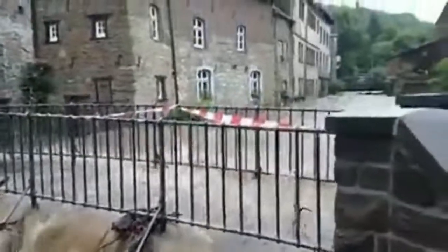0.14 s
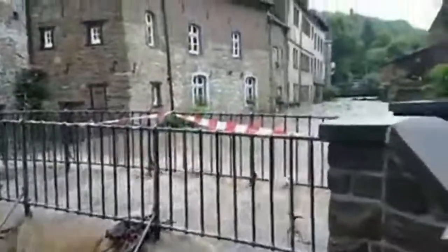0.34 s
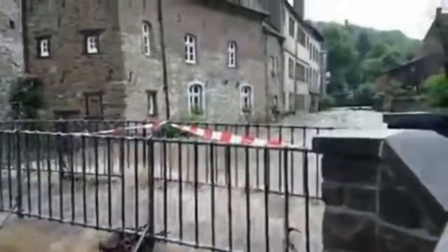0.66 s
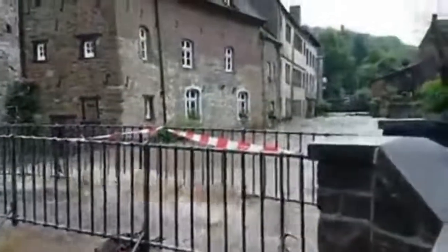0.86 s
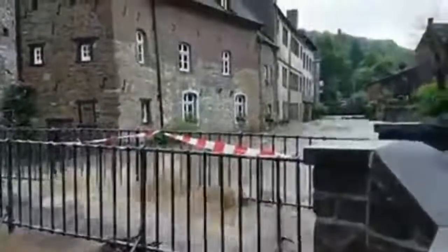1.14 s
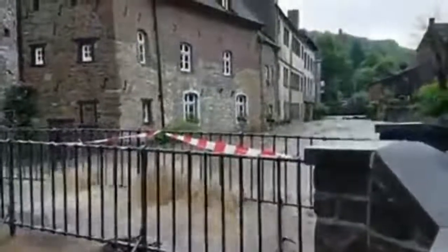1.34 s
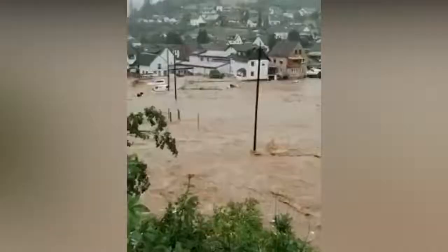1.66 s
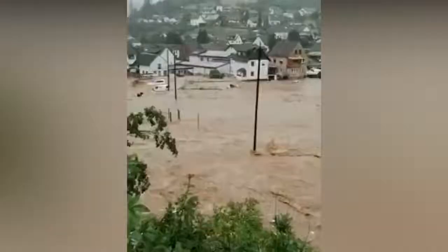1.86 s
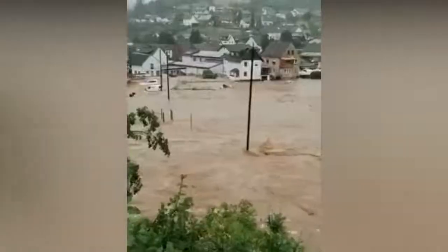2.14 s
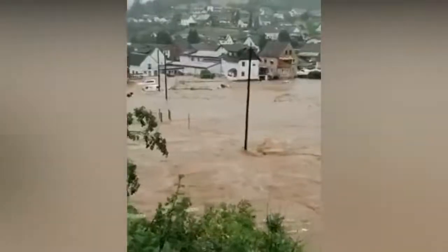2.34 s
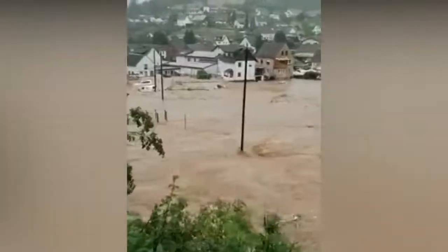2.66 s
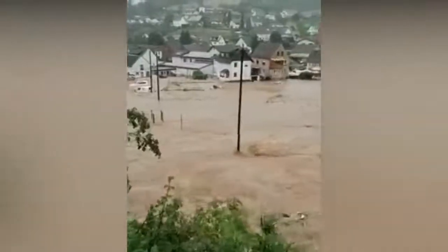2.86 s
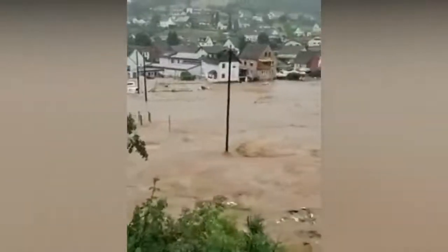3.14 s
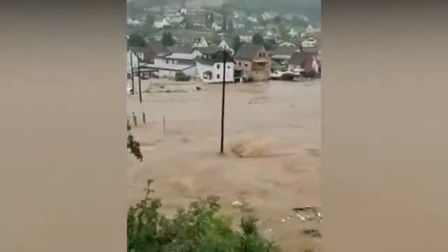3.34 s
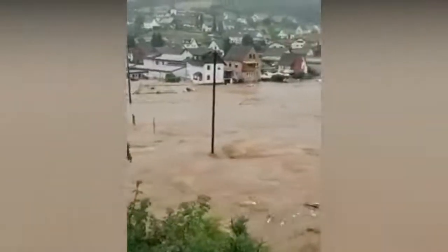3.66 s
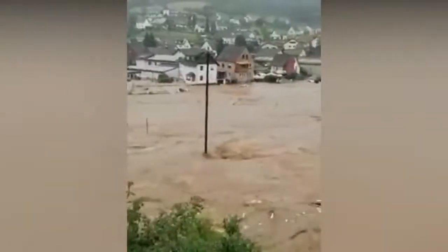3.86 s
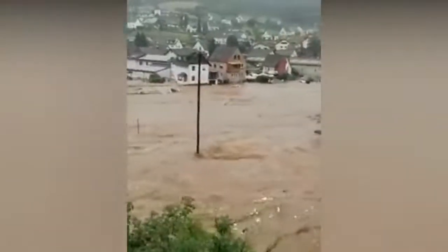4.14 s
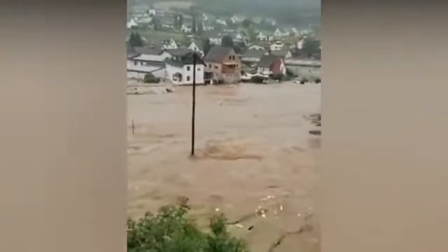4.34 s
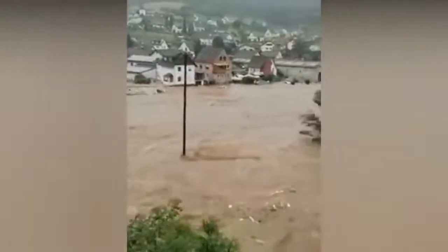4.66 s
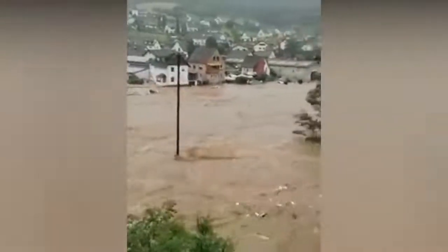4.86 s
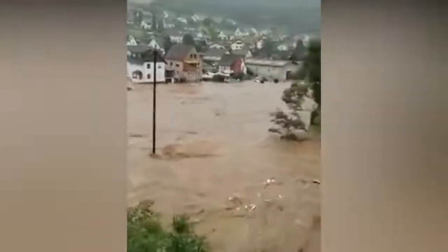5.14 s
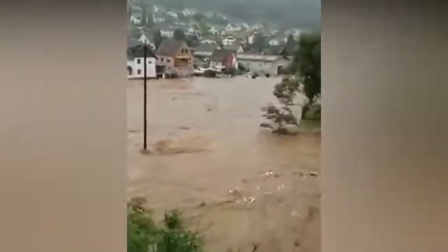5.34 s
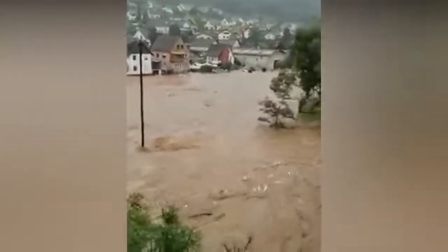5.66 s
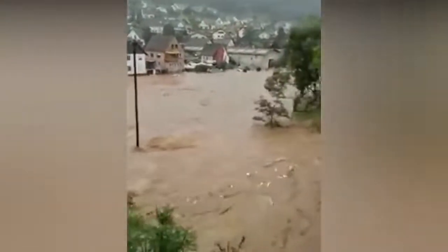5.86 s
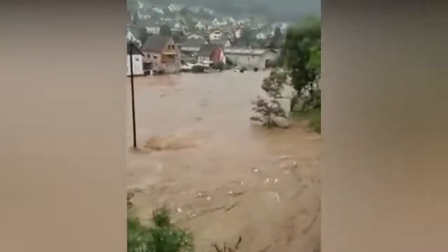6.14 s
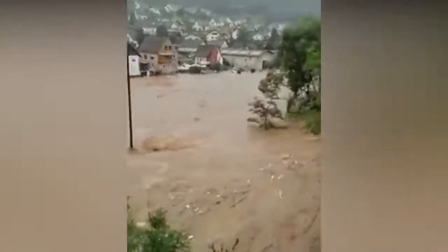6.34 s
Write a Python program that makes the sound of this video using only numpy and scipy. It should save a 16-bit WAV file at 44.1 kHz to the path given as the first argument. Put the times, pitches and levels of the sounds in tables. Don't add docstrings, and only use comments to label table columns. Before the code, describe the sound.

Loud close floodwater on a stone street, caught by a two-microphone phone with grainy compressed treble: churning bubbles, spray, slops ringing in a hollow, wind thumps. A hard cut leaves brief silence. Then, from a hillside, another phone hears a broad swollen river, smoother, duller and much quieter, a continuous rush with no separate splashes, faint wind nudges and a slightly flickering top end.

```python
import sys
import numpy as np
from scipy import signal
from scipy.fft import rfft, irfft, next_fast_len
from scipy.io import wavfile
from scipy.ndimage import uniform_filter1d, map_coordinates

SR = 44100
rng = np.random.default_rng(int(sys.argv[2]) if len(sys.argv) > 2 else 0)


def gain_from_db(level_db):
    decades = np.asarray(level_db, float) / 20
    return 10 ** decades


def output_pcm(signal):
    pcm = np.clip(np.atleast_2d(signal).T, -1, 1) * 32767
    wavfile.write(sys.argv[1], SR, np.round(pcm).astype(np.int16))


N = 286209


def unit(x):
    return x / np.sqrt(np.mean(x ** 2) + 1e-20)


def along(points, hz):
    f, v = np.transpose(points)
    return np.interp(np.log(hz + 1), np.log(f + 1), v)


def curve(rows):
    s, value = np.transpose(rows)
    return np.interp(np.arange(N) / SR, s, value)


def near(t, moments, within_s):
    return abs(t[:, None] - moments).min(axis=1) < within_s


def wobble(rate_hz):
    knots = rng.standard_normal(int(N * rate_hz / SR) + 4)
    return map_coordinates(knots, [np.arange(N) * rate_hz / SR])


def filtered(x, response):
    m = next_fast_len(N + 8192)
    return irfft(rfft(x, m) * response(np.fft.rfftfreq(m, 1 / SR)), m)[..., :N]


def coloured(x, spectrum):
    return filtered(x, lambda hz: gain_from_db(along(spectrum, hz)))


def patches(shape, bins, frames):
    field = uniform_filter1d(rng.standard_normal(shape), size=bins, axis=-2)
    return unit(uniform_filter1d(field, size=frames, axis=-1))


def to_lines(x):
    return signal.stft(x, SR, "cosine", nperseg=2048, noverlap=1024)


def from_lines(z):
    return signal.istft(z, SR, "cosine", nperseg=2048, noverlap=1024)[1][..., :N]


def local_level(z):
    return np.sqrt(abs(uniform_filter1d(abs(z) ** 2, size=32, axis=-2)))


def bubbles(count):
    when, pitch, size, port = rng.random((count, 4)).T
    hz, t = 300 * 25 ** pitch[:, None], np.arange(256) / SR
    cycles = hz * t * (1 + .04 * hz * t)
    decay = hz * t * np.exp(-hz * t / 1.8) * np.hanning(512)[256:]
    burst = -np.log(1 - size[:, None]) * np.sin(2 * np.pi * cycles) * decay
    where = (when * N).astype(int)[:, None] + np.arange(256) + (port[:, None] > .5) * (N + 256)
    return np.bincount(where.ravel(), burst.ravel(), 2 * (N + 256)).reshape(2, -1)[:, :N]


def churn(patchy_db, bubble_db, count):
    z = signal.stft(rng.standard_normal((2, N)), nperseg=512)[2]
    gain = gain_from_db(patchy_db * patches(z.shape[1:], 5, 10))
    bed = signal.istft(z * gain, nperseg=512)[1][:, :N]
    return unit(bed) + gain_from_db(bubble_db) * unit(bubbles(count))


# f/Hz, coherence/1
PORT_LIKENESS = [(150, 1), (230, .998), (330, .95), (600, .7), (1200, .36), (1500, .5), (1800, .42),
                 (2200, .14), (2700, .38), (3300, .06), (13000, .12)]
# f/Hz, phase/rad
LEFT_LEAD = [(220, 0), (600, .2), (1000, 1.2), (1500, 3.1), (2700, 6.5), (13000, 30)]
# f/Hz, level/dB
LEFT_TILT = [(200, 0), (660, -1), (1200, -2), (2300, -4), (4000, -2), (6800, 0), (8500, 4.8), (13300, 4.6)]


def ports(pair, spectrum):
    def mix(hz):
        turn = np.arccos(np.clip(along(PORT_LIKENESS, hz), 0, 1)) / 2
        return gain_from_db(along(spectrum, hz)) * [np.cos(turn), np.sin(turn)]

    half = np.array([[.5], [-.5]])

    def tilt(hz):
        return gain_from_db(half * along(LEFT_TILT, hz)) * np.exp(1j * half * along(LEFT_LEAD, hz))

    shared, apart = filtered(pair, mix)
    return unit(filtered(np.array([shared + apart, shared - apart]), tilt))


# f/Hz, level/dB per Hz
SURGE_SPECTRUM = [(40, -43), (60, -15), (85, -7.5), (150, -4), (200, -7), (290, -6.5), (420, -17),
                  (600, -59.5)]


def surge(heave_db, swell):
    return gain_from_db(-20.5 + heave_db + .2 * swell) * ports(churn(.3, -29.5, count=2000), SURGE_SPECTRUM)


# f/Hz, level/dB per Hz
GURGLE_SPECTRUM = [(200, -44), (280, -10.5), (370, -4), (650, -2.5), (1000, -4.5), (1300, -5), (1700, -16),
                   (2400, -56)]


def gurgle(heave_db, swell):
    level_db = -19.5 + .2 * heave_db + .34 * swell
    return gain_from_db(level_db) * ports(churn(.83, -24, count=9000), GURGLE_SPECTRUM)


# f/Hz, level/dB per Hz
SPRAY_SPECTRUM = [(900, -42), (1400, -1.5), (2000, -3), (2700, -3), (3600, -6.5), (4500, -8), (6000, -9),
                  (7200, -13.5), (8400, -19), (9500, -22.5), (13300, -22.5)]


def spray(heave_db, swell):
    drops = ports(churn(.97, -18.5, count=9000), SPRAY_SPECTRUM)
    mist = filtered(drops, lambda hz: np.clip((hz - 6500) / 2500, 0, 1))
    puffs = gain_from_db(1.1 * wobble(22)) - 1
    return gain_from_db(-18 + .15 * heave_db + .34 * swell) * (drops + puffs * mist)


# t/s, peak level/dB
PUFFS = [(.19, -34), (.28, -31), (.58, -34.5), (.77, -36), (.94, -36), (1.1, -35), (1.27, -35), (1.48, -34),
         (1.63, -34.5), (2.67, -53), (2.88, -55), (3.04, -47), (3.4, -59), (3.68, -51), (3.9, -46),
         (4.04, -49), (4.3, -45), (4.56, -53), (5.04, -41.5), (5.1, -43), (5.25, -50), (5.63, -51),
         (5.83, -49), (6.14, -51), (6.43, -55)]
PUFF_RISE_DB_S, PUFF_FALL_DB_S = 143, 112.5


def gusts():
    s, peak_db = np.transpose(PUFFS)
    since = np.arange(0, N + 256, 256)[:, None] / SR - s
    slope = np.where(since < 0, -PUFF_RISE_DB_S, PUFF_FALL_DB_S)
    level_db = (peak_db - slope * since).max(axis=1)
    return np.interp(np.arange(N), np.arange(len(level_db)) * 256, level_db)


# f/Hz, level/dB per Hz
BUFFET_SPECTRUM = [(15, -25.5), (28, -7.5), (45, 2), (75, 0.5), (120, -35.5)]


def wind(buffet_db, lumpy_db):
    push = coloured(rng.standard_normal(N), BUFFET_SPECTRUM)
    push = push / np.sqrt(abs(uniform_filter1d(push ** 2, size=SR // 16)) + 1e-12)
    return gain_from_db(buffet_db) * unit(gain_from_db(lumpy_db * wobble(12)) * push)


# t/s, pitch f/Hz, peak level/dB
GULPS = [
    (.22, 660, -21),
    (.68, 488, -24.5),
    (.76, 405, -26.5),
    (.82, 388, -20),
    (1.229, 600, -27.5),
]
GULP_RISE_S, GULP_FALL_S, GULP_WIDTH = .022, .05, .069


def slops():
    t = np.arange(N) / SR
    total = np.zeros(N)
    for s, pitch_hz, peak_db in GULPS:
        ring = filtered(rng.standard_normal(N), lambda hz: np.exp(-((hz / pitch_hz - 1) / GULP_WIDTH) ** 2))
        envelope = np.exp(-abs(t - s) / np.where(t < s, GULP_RISE_S, GULP_FALL_S))
        total += gain_from_db(peak_db) * envelope * unit(ring)
    return total


# t/s, level/dB
STREET_HEAVE = [
    (0, -0.5),
    (.2, -0.5),
    (.6, -1.5),
    (.75, -2),
    (1.0, -0.5),
    (1.25, 0.5),
    (1.35, -.5),
    (1.68, 1.5),
]


def street():
    heave_db, swell = curve(STREET_HEAVE), wobble(11.82)
    water = surge(heave_db, swell) + gurgle(heave_db, swell) + spray(heave_db, swell)
    return water + wind(gusts(), lumpy_db=3.5) + slops()


# f/Hz, share/1
COARSENESS = [(600, 0), (1500, .6), (2500, .5), (4000, 1.0), (7500, 1.2), (8500, .7), (13500, .6)]
# f/Hz, share/1
BAND_FRAGILITY = [(1150, 0), (1500, .14), (1950, 0), (3500, 0), (4500, .06), (6000, .05), (7000, .2),
                  (7900, .16), (8400, .02), (13500, .03)]
# low f/Hz, high f/Hz
WEAK_BANDS_HZ = [
    (7650, 8200),
    (6700, 7050),
    (1450, 1620),
]
# t/s, length/s, weak band number
BAND_LOSSES = [(0, .07, 0), (.12, .04, 0), (.35, .09, 0), (.65, .02, 0), (.72, .03, 0), (1.24, .06, 0),
               (.19, .04, 1), (1.05, .05, 1), (1.55, .08, 1), (.15, .13, 2), (.6, .03, 2), (.85, .13, 2)]
RIGHT_STARVED_S = [.23, .55, .7, .79, 1.15, 1.35, 1.49]
WARM_UP_S, RECOVER_S = .1, .9


def first_phone(x):
    hz, t, z = to_lines(np.array([x[0] + x[1], x[0] - x[1]]) / 2)
    z = z * (abs(z) > along(COARSENESS, hz)[:, None] * local_level(z))

    bands = np.repeat(patches((2, 129, len(t)), 1, 3), 8, axis=1)[:, :len(hz)]
    rank = np.argsort(np.argsort(bands, axis=None)).reshape(bands.shape) / bands.size
    share = along(BAND_FRAGILITY, hz) * [hz > 0, hz > 3000]
    z = z * (rank > share[..., None])
    for start, length, band in BAND_LOSSES:
        low, high = WEAK_BANDS_HZ[int(band)]
        lost = (t > start - .015) & (t < start + length + .015)
        z[0][np.ix_((hz > low) & (hz < high), lost)] = 0

    z = np.array([z[0] + z[1], z[0] - z[1]])
    lasting = np.repeat(patches((129, len(t)), 1, 10), 8, axis=0)[:len(hz)]
    filling = np.where(t < WARM_UP_S, -5, np.interp(t, [WARM_UP_S, RECOVER_S], [-1.2, -.2]))
    fed = lasting - 1.5 * near(t, RIGHT_STARVED_S, .022) + filling
    strong = abs(z[1]) > .9 * local_level(z[1])
    z[1] *= (fed > -1.3) & strong | (hz[:, None] < 8500)
    return from_lines(z * (hz < 13600)[:, None])


# f/Hz, level/dB per Hz
ROAR_SPECTRUM = [(30, -48), (50, -32), (85, -4.5), (141, -1.5), (230, -0.5), (457, -5.5), (614, -2.5),
                 (1420, -12), (1600, -11.5), (2080, -17.5), (3520, -120)]
# f/Hz, level/dB per Hz
HISS_SPECTRUM = [(710, -17.5), (1200, -9.5), (1420, -9.5), (2060, 1), (2380, -3), (2700, -7), (3100, -10),
                 (3730, -10), (5330, -12.5), (7090, -22), (7600, -30), (9880, -61.5)]
# t/s, level/dB
RIVER_LEVEL = [
    (2.17, -32.5),
    (2.19, -34),
    (2.89, -37),
    (2.92, -40.5),
    (3.11, -40.5),
    (3.43, -38),
    (4.42, -38.5),
    (6.49, -38),
]


def river():
    roar = unit(coloured(churn(.57, -26.5, count=5000)[0], ROAR_SPECTRUM))
    hiss = unit(coloured(churn(.46, -28.5, count=5000)[0], HISS_SPECTRUM))
    water = gain_from_db(1.7 + .2 * wobble(5.9)) * roar + gain_from_db(-5.5 + .15 * wobble(17)) * hiss
    return gain_from_db(curve(RIVER_LEVEL)) * water + wind(gusts(), lumpy_db=-.5)


TOP_LOST_S = [2.77, 3.63, 3.65, 3.82, 4.0, 4.13, 4.45, 4.47, 4.99, 5.13, 5.16, 5.19, 5.71, 5.84, 5.95, 5.99,
              6.14, 6.47]
THIN, THIN_FROM_HZ = .4, 1500
RESIDUE_DB = -89.5


def second_phone(x):
    hz, t, z = to_lines(x)
    z = z * (abs(z) > THIN * (hz[:, None] > THIN_FROM_HZ) * local_level(z))
    edge_hz = np.where(near(t, TOP_LOST_S, .02), 7150, 7500)
    kept = from_lines(z * (hz[:, None] < edge_hz))
    residue = filtered(rng.standard_normal(N), lambda hz: (hz > 8250) * gain_from_db(-2.2 * (hz - 8000) / 1000))
    return kept + gain_from_db(RESIDUE_DB + curve(RIVER_LEVEL) + 35.5) * unit(residue)


CUT_S, START_S, ENTRY_S = 1.6815, 2.1562, .0015
CUT_DROP_DB, SMEAR_DB_S, SMEAR_S, END_DB_S = -24, 400, .012, 3500
LEAD_IN_DB, LEAD_IN_S = -33, .02


def scene():
    t = np.arange(N) / SR
    since = t - CUT_S
    smear = gain_from_db(CUT_DROP_DB - SMEAR_DB_S * since.clip(0) - END_DB_S * (since - SMEAR_S).clip(0, .1))
    street_gain = np.maximum(smear, np.clip(-since / ENTRY_S + .5, 0, 1))
    entry = np.clip((t - START_S) / ENTRY_S + 1, 0, 1)
    river_gain = np.maximum(entry, gain_from_db(LEAD_IN_DB) * (t > START_S - LEAD_IN_S))
    return street_gain * first_phone(street()) + river_gain * second_phone(river())


def roll_off(x):
    return signal.sosfilt(signal.butter(12, 15100, fs=SR, output="sos"), x)


def record(dry):
    return roll_off(dry)


dry = scene()
out = record(dry)
output_pcm(out)
```